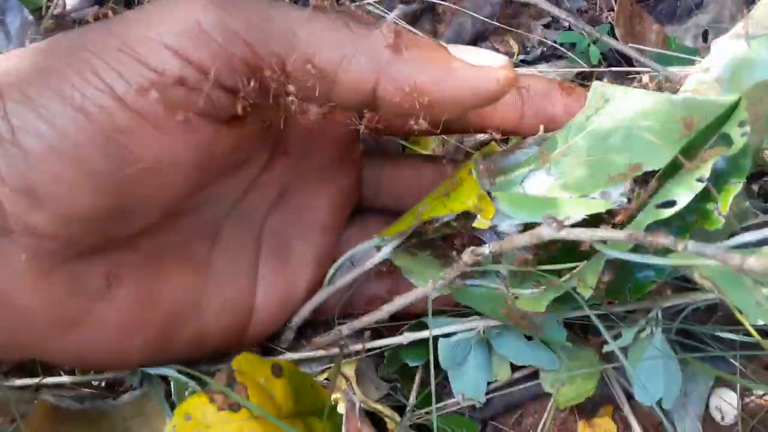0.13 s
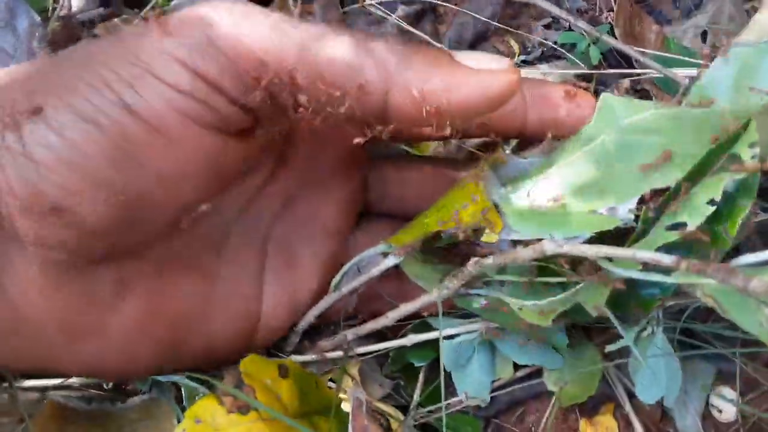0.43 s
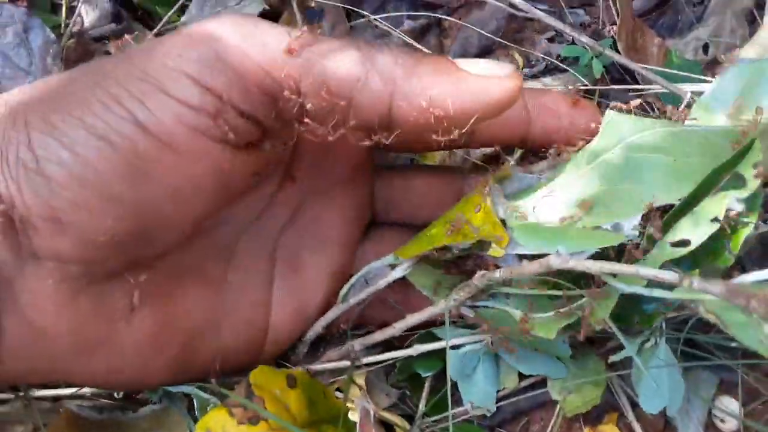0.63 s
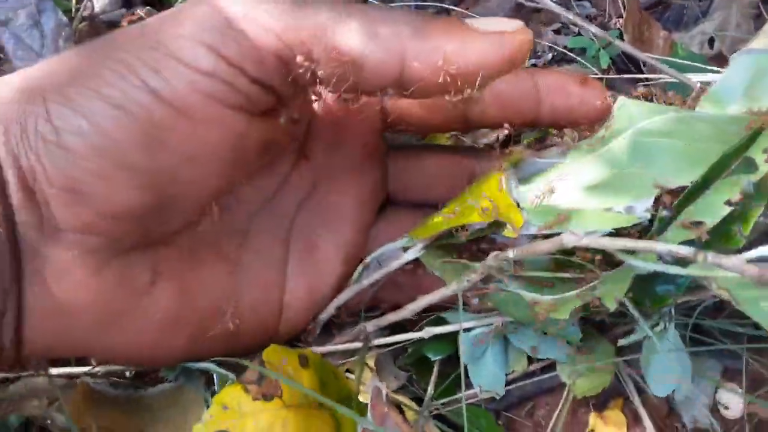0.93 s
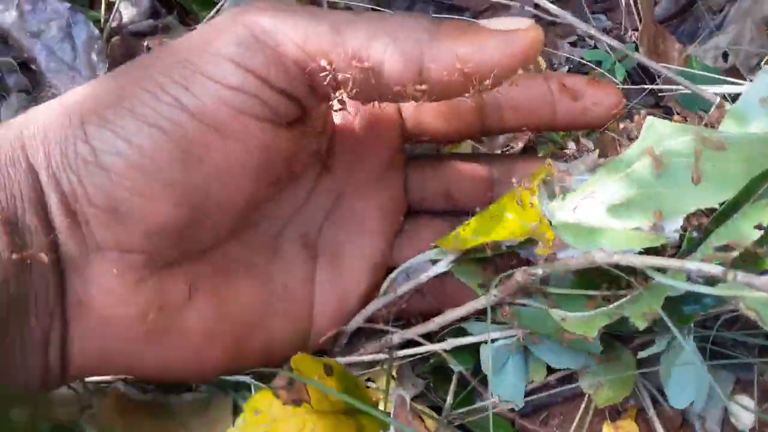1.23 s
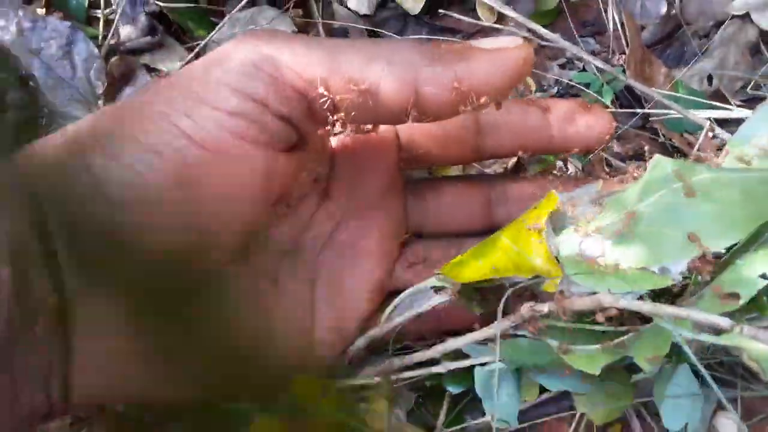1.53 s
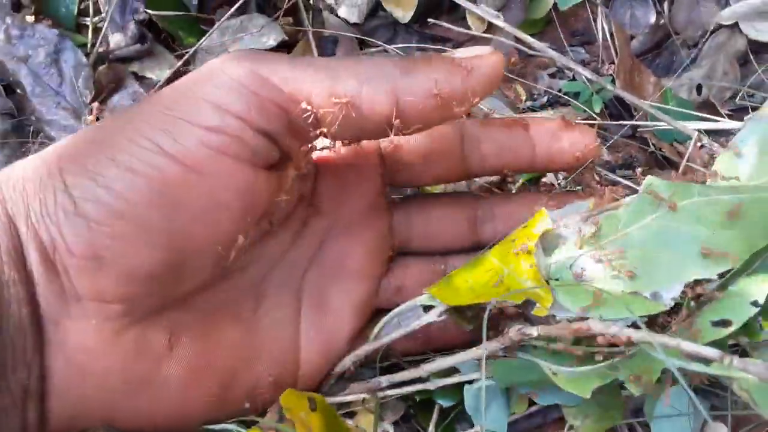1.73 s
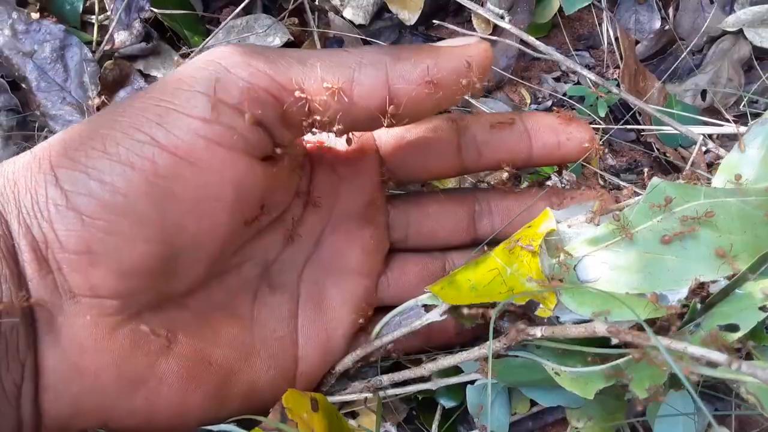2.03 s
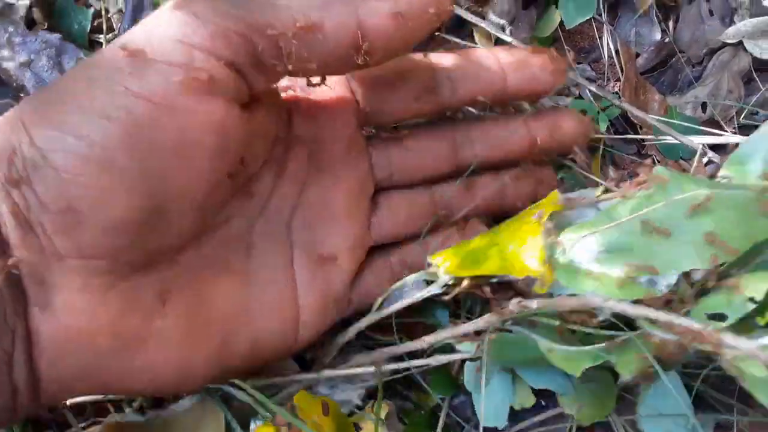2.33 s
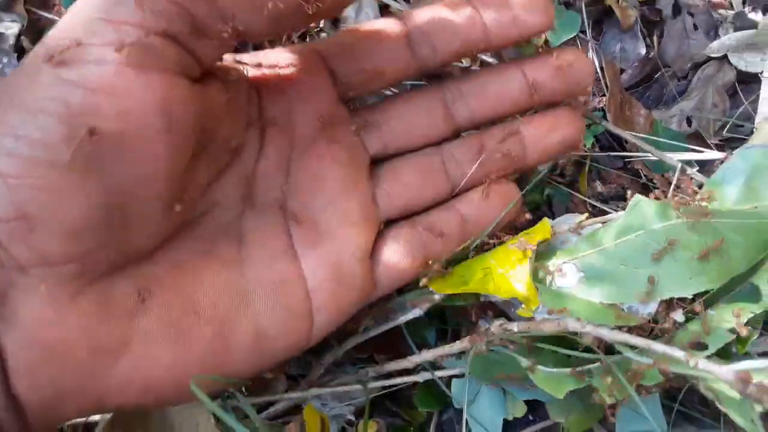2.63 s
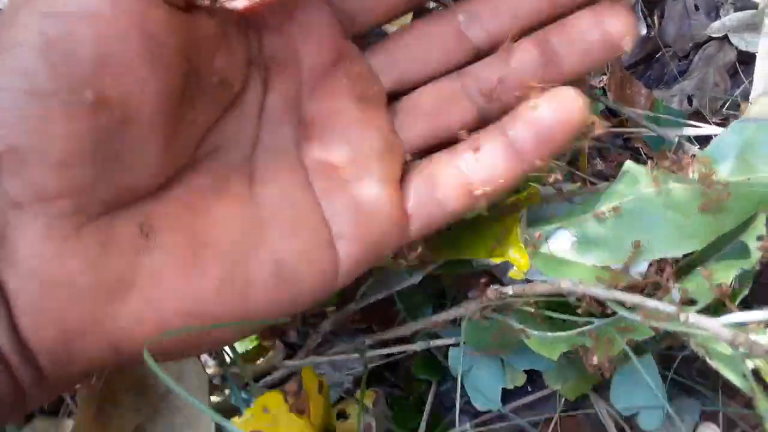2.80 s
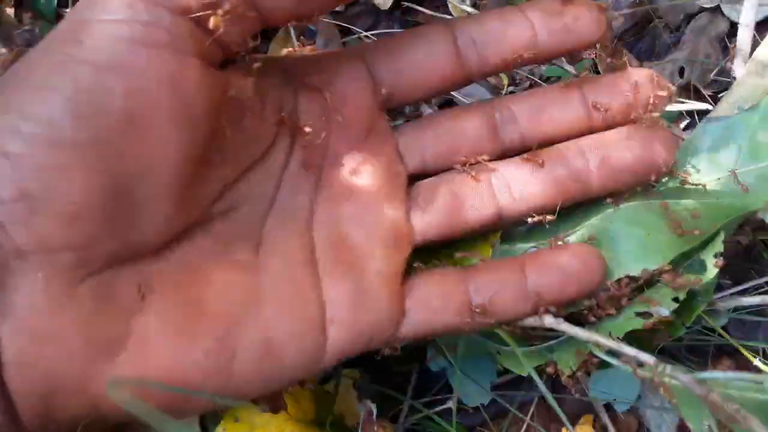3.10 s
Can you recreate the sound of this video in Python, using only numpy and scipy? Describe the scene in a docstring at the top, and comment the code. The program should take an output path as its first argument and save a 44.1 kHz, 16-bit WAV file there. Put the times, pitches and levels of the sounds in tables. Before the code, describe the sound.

Soft leaf rustling with small dry snaps outdoors, with faint chirps and low microphone bumps.

```python
"""Outdoors, a low rumble, a faint hum and a thin hiss run from start to end.
An open hand pushes slowly under the leaves of an ant nest: dry bits snap, a twig is tapped,
and the leaves slide and crackle. Small birds begin to call from the trees. Halfway through
come three thin squeaks; then the moving hand-held camera close by picks up soft, low bumps."""
import sys
import numpy as np
from scipy import signal
from scipy.fft import rfft, irfft
from scipy.io import wavfile

SR = 44100
rng = np.random.default_rng(int(sys.argv[2]) if len(sys.argv) > 2 else 0)


def to_wav(s):
    """Save 16-bit WAV."""
    ch = np.atleast_2d(s).T  # columns
    pcm = np.round(np.clip(ch, -1, 1) * 32767)  # PCM
    wavfile.write(sys.argv[1], SR, pcm.astype(np.int16))


N = 143766

# Tone colours of the steady noises: (frequency [Hz], relative level [dB])
RUMBLE_COLOUR = [(31, -16.5), (44, 2), (70, -4.5), (115, -1), (230, -8), (310, -15), (450, -25.5),
                 (800, -34.5)]
HISS_COLOUR = [(200, -12.5), (450, 1.5), (780, -2.5), (1000, -1.5), (2500, -1), (3100, -12), (4000, -8),
               (5000, -8.5), (6500, -16), (8400, -33.5), (10000, -20.5), (12000, -8), (15000, 3)]
MICROPHONE_COLOUR = [(60, -9), (500, 8), (8000, -19.5), (14500, 9.5), (16000, -36)]
# How loud the hum is: (time [s], level [dB])
HUM_LEVELS = [(.42, -56), (.52, -50.5), (1.15, -57.5), (1.67, -49.5)]

# A leaf's three bands of sound, low to high: (frequency [Hz], relative level [dB])
BODY_BAND = [(150, -25.5), (330, 1), (560, 6), (760, 0.5), (1000, 5.5), (1500, 3), (2300, 0), (3000, -14.5),
             (4500, -40)]  # the bending blade
CRISP_BAND = [(1500, -24), (2600, -5), (5100, -3), (6300, -9), (7300, -14.5), (8400, -28.5), (10000, -42.5)]  # the crisp edge
FIZZ_BAND = [(7000, -85), (8500, -23), (10300, -7), (11500, -5.5), (13000, 0.5), (14300, 2.5), (15300, 4.5),
             (16000, -32)]  # the fine fizz
# Dry bits snapping, before each band's gain:
# (time [s], fizz level [dB], crisp level [dB], body level [dB], ring pitch [Hz])
DRY_SNAPS = [(0.0405, -43, -53, -48, 1880), (0.0788, -45.5, -54.5, -56, 1800),
             (0.185, -41.5, -58, -44, 5060), (0.3195, -52, -58.5, -52, 2270), (0.4265, -36, -46, -75, 4830),
             (1.0728, -44, -58, -47, 5230), (1.1451, -45, -57, -51, 2030), (1.1556, -60, -54, -59, 5900),
             (1.1749, -48, -49, -50, 2090), (1.306, -50, -51, -47, 2750), (1.316, -58, -47.5, -47, 2500),
             (1.387, -50, -47.5, -50, 3370), (1.428, -50, -49.5, -58, 4200),
             (1.5139, -37.5, -46, -38, 2380), (1.5362, -53, -58, -44, 1880), (1.5445, -36, -48, -48, 2440),
             (1.6357, -31.5, -42, -39.5, 3180), (1.6802, -39.5, -48, -38, 4960),
             (2.0229, -37, -57.5, -47, 2540), (2.1575, -38, -52.5, -61, 5080),
             (2.349, -43, -47.5, -67, 3500), (2.3629, -55, -43, -64, 4740), (3.028, -42, -61, -72, 2000),
             (3.0539, -36, -41.5, -56, 3650), (3.079, -41, -44, -66, 4940), (3.127, -48, -47, -34, 1460)]
# How each band answers a snap, from body to fizz: (gain [dB], fade time [s])
SNAP_RESPONSE = [(-8.5, 0.0034), (-2, 0.0026), (1, 0.0013)]
# Taps on a twig: (time [s], strength [dB])
TWIG_TAPS = [(0.041, -50.5), (0.06, -61.5), (0.078, -64)]
# The tones the twig rings with: (pitch [Hz], relative level [dB])
TWIG_TONES = [(1590, -4), (1900, -4), (2210, -9)]
# Leaves sliding: (start [s], length [s], body level [dB], crisp level [dB], fizz level [dB])
LEAF_STROKES = [(0.046, 0.067, -62.5, -70, -64), (0.116, 0.23, -71, -74.5, -71),
                (0.386, 0.084, -61, -63, -66), (0.47, 0.19, -73, -71.5, -69.5), (1.055, .14, -67, -65, -64),
                (1.216, 0.097, -76, -64, -63.5), (1.34, 0.16, -63.5, -60.5, -60.5),
                (1.512, 0.042, -59, -56, -56.5), (1.581, 0.23, -63, -62.5, -60),
                (1.792, 0.11, -69.5, -74.5, -71), (2.102, 0.089, -68, -71.5, -66),
                (2.197, 0.14, -60, -62, -59.5), (2.341, 0.04, -56.5, -55, -50.5),
                (2.416, 0.096, -58, -58, -53.5), (2.457, 0.18, -61.5, -68, -62),
                (2.62, 0.38, -65, -77, -70), (2.793, 0.13, -67, -68, -63), (3.051, 0.072, -58, -57, -54),
                (3.096, 0.036, -55, -52, -49.5), (3.134, 0.06, -53.5, -57, -56.5),
                (3.194, 0.11, -63, -67.5, -66)]
# The hollow note of the leaf being rubbed: (time [s], pitch [Hz])
HOLLOW_PITCH = [(.15, 1950), (.4, 594), (1.1, 1430), (2.3, 1100), (2.8, 930), (3.12, 680)]

# The far bird's notes: (start [s], length [s], top pitch [Hz])
FAR_NOTES = [(0.578, 0.046, 2710), (.775, 0.048, 2750), (0.844, 0.068, 2430)]
# The near bird's chirps: (start [s], strength [dB])
NEAR_CHIRPS = [(0.929, -58.5), (1.243, -59.5), (1.55, -60.5), (1.846, -57)]
# The rise and fall of each chirp: (time into the chirp [s], pitch [Hz])
CHIRP_ARCH = [(0, 2500), (.008, 3120), (.017, 3420), (.029, 3360), (.042, 2970), (.057, 2730)]
# Squeaks: (start [s], length [s], first pitch [Hz], top pitch [Hz], place of top [0-1], level [dB])
THIN_SQUEAKS = [(1.517, .01, 3900, 5300, .55, -56), (1.564, .023, 4600, 6850, .4, -58),
                (1.65, .019, 3950, 5600, .75, -55)]

# Bumps on the camera body: (time [s], level [dB], pitch [Hz])
CAMERA_BUMPS = [(1.824, -33, 93), (2.089, -32, 80), (2.217, -35.5, 105), (2.259, -33, 89),
                (2.283, -33.5, 116), (2.38, -31.5, 170), (2.392, -27.5, 61), (2.503, -31.5, 187),
                (2.518, -29.5, 108), (2.538, -39, 127), (2.59, -27.5, 66), (2.616, -36, 86),
                (2.677, -31.5, 98), (2.712, -26.5, 75.6), (2.77, -34, 95), (2.88, -29.5, 73),
                (3.162, -27.5, 82), (3.192, -25, 94.3)]
# How loud the shifting grip rumbles: (time [s], level [dB])
GRIP_LEVELS = [(2.0, -95), (2.25, -43.5), (2.45, -54.5), (2.53, -38.5), (2.72, -44), (2.82, -52),
               (3.08, -54.5), (3.17, -41.5)]
# The tone colour of that rumble: (frequency [Hz], relative level [dB])
GRIP_RUMBLE = [(20, -16.5), (45, -1.5), (70, -8), (120, 0.5), (200, -12.5), (300, -21.5), (600, -37.5)]

LEAF_BANDS = (BODY_BAND, CRISP_BAND, FIZZ_BAND)


def amp(db):
    """Turns decibels into a number to multiply by."""
    return 10 ** (np.asarray(db) / 20)


def unit(x):
    """Scales a signal to an average (rms) size of 1."""
    return x / np.sqrt(np.mean(x ** 2) + 1e-20)


def add(mix, start, sound):
    """Adds a sound into the mix at a start time in seconds."""
    part = mix[max(round(start * SR), 0):][:len(sound)]
    part += sound[:len(part)]


def level(points):
    """A volume curve through (time [s], level [dB]) points."""
    return amp(np.interp(np.arange(N) / SR, *np.transpose(points)))


def colour(x, points):
    """Filters a sound to a tone colour; white noise keeps its power."""
    freqs, db = np.transpose(points)
    hz = abs(np.fft.fftfreq(2 * N, 1 / SR))
    curve_db = np.interp(np.log(hz + 1), np.log(np.append(freqs, freqs[-1] * 2)), np.append(db, -90))
    # This makes the filter ring after a click, never before it.
    response = np.exp(np.conj(signal.hilbert(np.log(amp(curve_db)))))
    response /= np.sqrt(np.mean(abs(response) ** 2))
    return irfft(rfft(x, 2 * N) * response[:N + 1])[:N]


def noise(points):
    """Steady noise with a tone colour, average size 1."""
    return unit(colour(rng.standard_normal(N), points))


def drift(seconds):
    """A smooth random wander, average size 1; more seconds make it slower."""
    smoothing = np.exp(-(np.fft.rfftfreq(N, 1 / SR) * seconds) ** 2)
    return unit(irfft(rfft(rng.standard_normal(N)) * smoothing, N))


def resonate(x, hz, width_hz):
    """Keeps the part of a sound that lies near a moving pitch."""
    turn = np.exp(2j * np.pi * np.cumsum(hz) / SR)
    r = np.exp(-np.pi * width_hz / SR)
    return 2 * (turn * signal.lfilter([(1 - r) ** 2], [1, -2 * r, r * r], x / turn)).real


def whistle(hz):
    """A pure tone that follows a pitch curve as it swells and fades."""
    swell = np.sqrt(2 * np.sin(np.pi * np.arange(len(hz)) / len(hz)))
    return swell * np.sin(2 * np.pi * np.cumsum(hz) / SR)


def background(hum_hz=91.45, waver=0.025):
    """A low rumble, a thin hiss and a far hum whose pitch wavers a little."""
    pitch = hum_hz * (1 + waver * drift(seconds=0.084))
    hum = np.sqrt(2) * np.sin(2 * np.pi * np.cumsum(pitch) / SR)
    return amp(-50) * noise(RUMBLE_COLOUR) + amp(-61.5) * noise(HISS_COLOUR) + level(HUM_LEVELS) * hum


def snaps(rise_s=0.0011, ring_s=0.0022, tail_s=0.008, tail_db=-37):
    """A fibre breaks in a burst, briefest in the treble; the bit rings and leaf litter scatters it."""
    t, out = np.arange(SR // 20) / SR, np.zeros(N)
    rise = np.minimum(t / rise_s, 1) ** 4
    after = np.maximum(t - rise_s, 0)
    tail = amp(tail_db) * np.exp(-after / tail_s)
    for k, (band, (gain_db, fade_s)) in enumerate(zip(LEAF_BANDS, SNAP_RESPONSE)):
        shape = rise * (np.exp(-after / fade_s) + tail)
        force = np.zeros(N)
        for start, *levels, _ in DRY_SNAPS:
            add(force, start, amp(levels[2 - k] + gain_db) * shape)  # levels run from fizz to body
        even_noise = np.sqrt(2) * np.cos(np.angle(signal.hilbert(noise(band))))  # constant strength
        out += unit(colour(force * even_noise, band)) * np.sqrt(np.mean(force ** 2))
    for start, _, crisp_db, body_db, hz in DRY_SNAPS:
        ring = rise * np.exp(-after / ring_s) * np.sin(2 * np.pi * hz * t)
        add(out, start, amp((crisp_db + body_db) / 2) * ring)
    return out


def twig_taps(fade_s=0.0092):
    """A twig is tapped and rattles; its woody tones die away quickly."""
    t, out = np.arange(SR // 10) / SR, np.zeros(N)
    ring = sum(amp(db) * np.sin(2 * np.pi * hz * t) for hz, db in TWIG_TONES) * np.exp(-t / fade_s)
    for start, db in TWIG_TAPS:
        add(out, start, amp(db) * ring)
    return out


def leaf_texture(crackles_per_s=580, spread_db=1, fade_s=0.0071, slide_share=0.38, clump_db=2):
    """The roughness of rubbing: a smooth slide plus tiny crackles, swelling in clumps."""
    sizes = amp(spread_db * np.minimum(rng.exponential(1, N), 4))
    clicks = sizes * (rng.random(N) < crackles_per_s / SR)
    crackle = signal.lfilter([1], [1, -np.exp(-2 / (fade_s * SR))], clicks ** 2)
    power = slide_share + (1 - slide_share) * crackle / crackle.mean()
    return unit(np.sqrt(power) * amp(clump_db * drift(seconds=0.016)))


def leaf_rustle(swell_s=0.019, release_s=0.013):
    """Each stroke of the hand sounds a leaf's three bands and hollow note, and sets off ticks."""
    t, power = np.arange(N) / SR, np.zeros((3, N))
    for start, length, *levels in LEAF_STROKES:
        swell = (1 + np.tanh((t - start) / swell_s)) / 2
        release = np.exp(-np.maximum(t - start - length + release_s, 0) / release_s)
        power += amp(levels)[:, None] ** 2 * swell * release
    strengths, texture = np.sqrt(power), leaf_texture()
    slide = sum(colour(strength * texture * rng.standard_normal(N), band)
                for strength, band in zip(strengths, LEAF_BANDS))
    hollow_hz = np.interp(t, *np.transpose(HOLLOW_PITCH))
    hollow = unit(resonate(texture * rng.standard_normal(N), hollow_hz, width_hz=260))
    return slide + amp(-4) * strengths[0] * hollow + amp(-6) * leaf_ticks(strengths)


def leaf_ticks(strengths, ticks_per_s=100, spread_db=5, fade_s=0.0006):
    """Scattered dry ticks; a harder stroke makes them louder, but only up to a limit."""
    clicks = (rng.random(N) < ticks_per_s / SR) * amp(spread_db * np.minimum(rng.exponential(1, N), 2))
    bursts = signal.lfilter([1], [1, -np.exp(-1 / (fade_s * SR))], clicks)
    sizes = np.minimum(strengths, amp(-59))
    return sum(size * unit(colour(bursts * rng.standard_normal(N), band))
               for size, band in zip(sizes, LEAF_BANDS))


def birds(rise_s=0.024, echo_s=0.029, trees_fade_s=0.31, flutter_db=3.5):
    """A far bird is heard only as sound bouncing off the trees; a near one chirps, with an echo."""
    far, near = np.zeros(N), np.zeros(N)
    for start, length, top_hz in FAR_NOTES:
        progress = np.arange(0, 1, 1 / (length * SR))
        pitch = top_hz * (1 - 0.13 * np.cos(np.pi * progress) ** 2)  # lower at both ends
        add(far, start, amp(-67) * whistle(pitch))
    times, pitches = np.transpose(CHIRP_ARCH)
    age = np.arange(0, times[-1], 1 / SR)
    chirp = whistle(np.interp(age, times, pitches)) * np.minimum(age / rise_s, 1)
    for start, db in NEAR_CHIRPS:
        add(near, start, amp(db) * chirp)
        add(near, start + echo_s, amp(db - 10) * chirp)
    t = np.arange(SR // 2) / SR
    trees = rng.standard_normal(len(t)) * amp(-60 * t / trees_fade_s)
    scatter = signal.fftconvolve(far + amp(-5) * near, trees / np.linalg.norm(trees))[:N]
    return near * amp(flutter_db * drift(seconds=0.018)) + scatter


def squeaks(flicker_db=2.5):
    """Thin, quick squeaks: the pitch shoots up, then falls halfway back."""
    out = np.zeros(N)
    for start, length, first_hz, top_hz, top_at, db in THIN_SQUEAKS:
        progress = np.arange(0, 1, 1 / (length * SR))
        arch = np.sin(np.pi / 2 * np.interp(progress, [0, top_at, 1], [0, 1, 0.5])) ** 2
        add(out, start, amp(db) * whistle(first_hz + (top_hz - first_hz) * arch))
    return out * amp(flicker_db * drift(seconds=0.004))


def camera_handling(rise_s=0.0044, fade_s=0.0042):
    """Soft bumps on the camera die away at once, over the rumble of the shifting grip."""
    t, out = np.arange(-SR // 20, SR // 10) / SR, np.zeros(N)
    shape = np.where(t < 0, np.exp(-(t / rise_s) ** 2 / 2), 1 / np.cosh(t / fade_s))
    for time, db, hz in CAMERA_BUMPS:
        add(out, time + t[0], amp(db) * shape * np.sin(2 * np.pi * hz * t))
    return out + level(GRIP_LEVELS) * noise(GRIP_RUMBLE)


def scene():
    """Both ears hear the same mix; only the microphones' own noise differs."""
    mix = background() + snaps() + twig_taps() + leaf_rustle() + birds() + squeaks() + camera_handling()
    microphone_noise = amp(-77) * noise(MICROPHONE_COLOUR)
    return np.array([mix + microphone_noise, mix - microphone_noise])


def record(dry, low_cut_hz=39.8, high_cut_hz=15850):
    """The camera cuts away the deepest bass and the highest treble."""
    low_cut = signal.butter(6, low_cut_hz, "highpass", fs=SR, output="sos")
    high_cut = signal.firwin(401, high_cut_hz, window=("kaiser", 8), fs=SR)
    return signal.oaconvolve(signal.sosfiltfilt(low_cut, dry), high_cut[None], "same")


dry = scene()
out = record(dry)
to_wav(out)
```